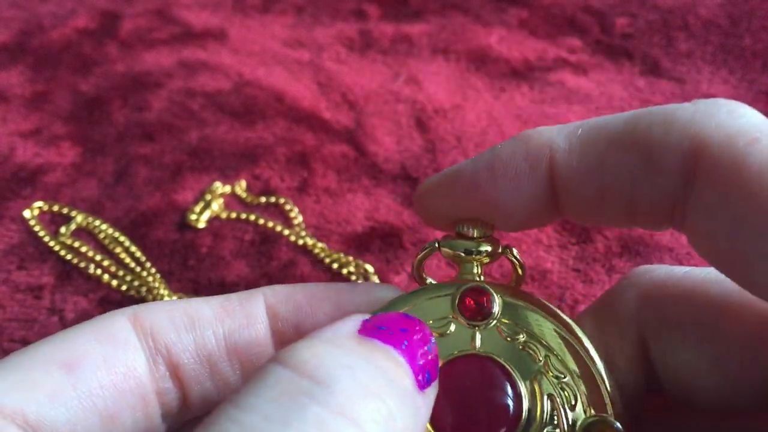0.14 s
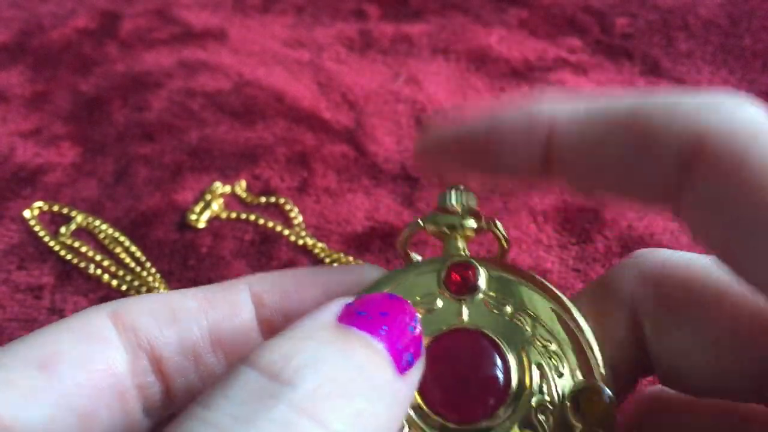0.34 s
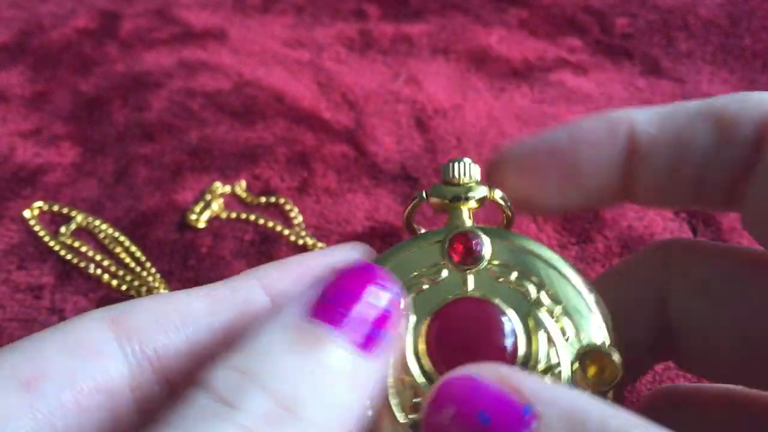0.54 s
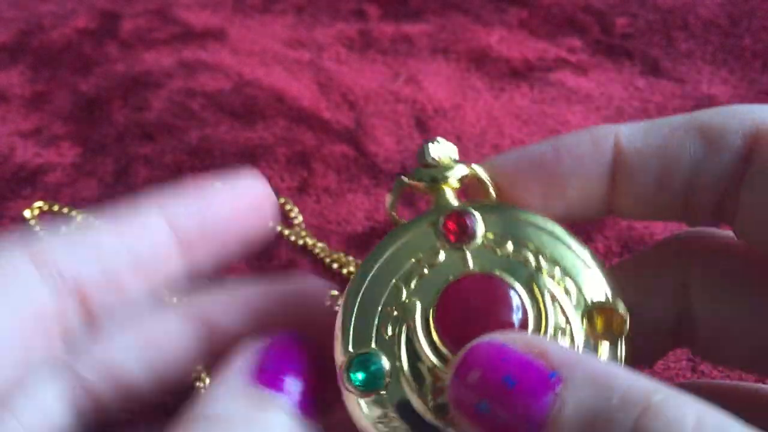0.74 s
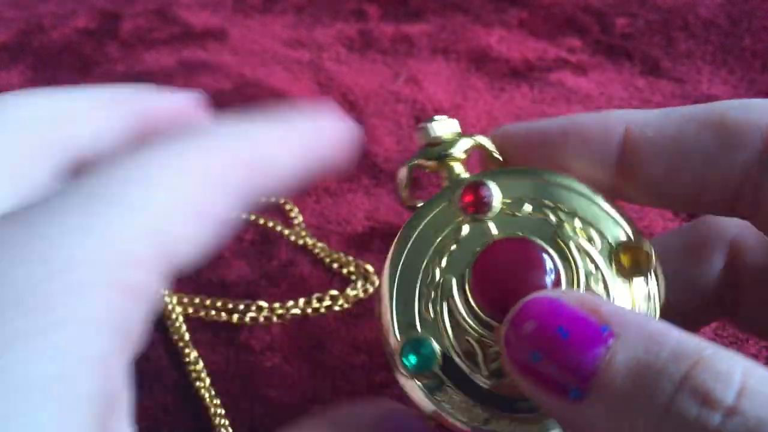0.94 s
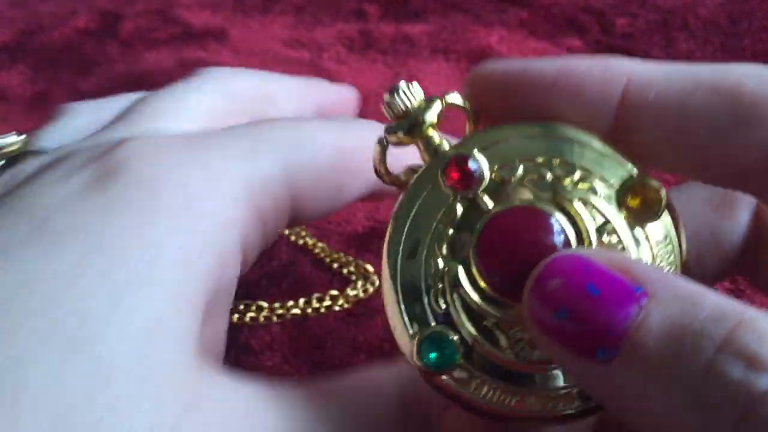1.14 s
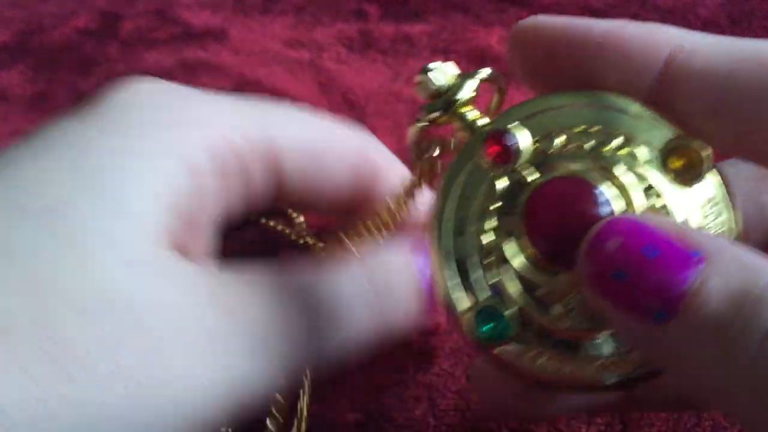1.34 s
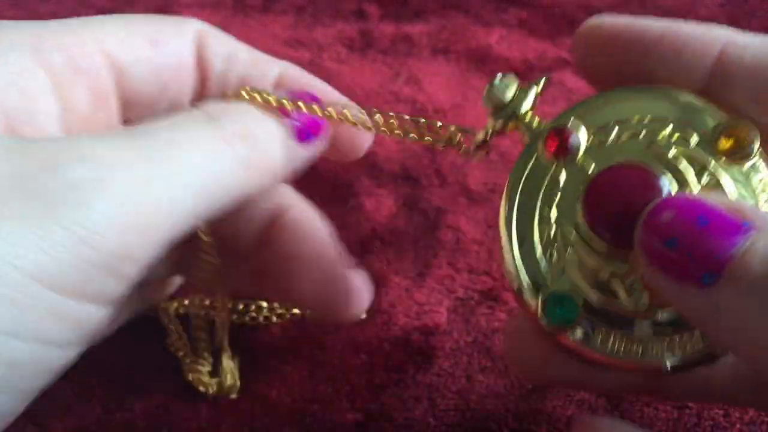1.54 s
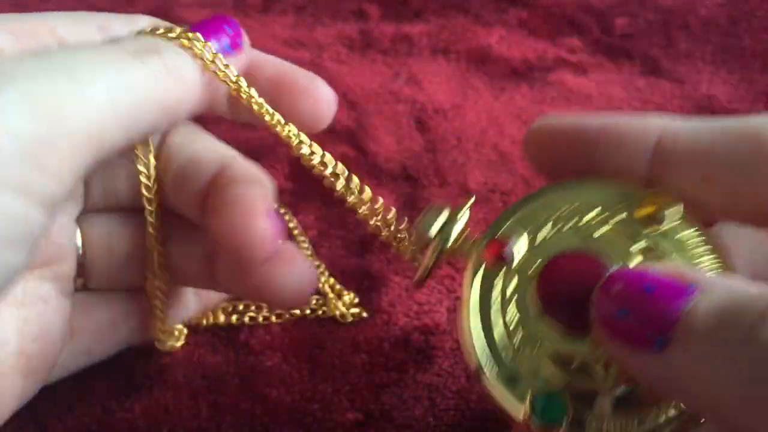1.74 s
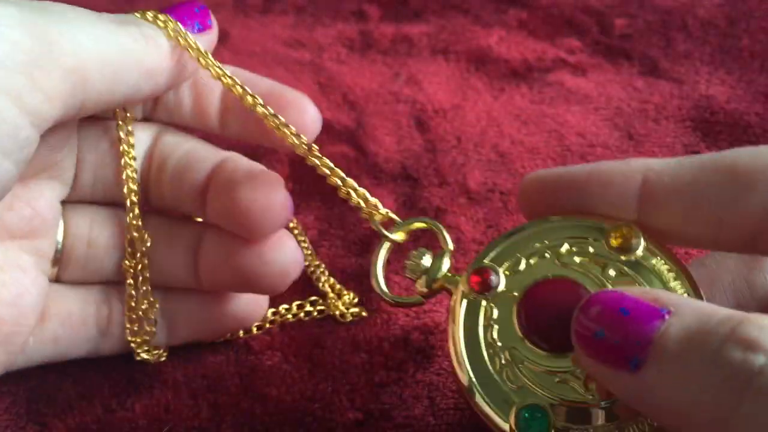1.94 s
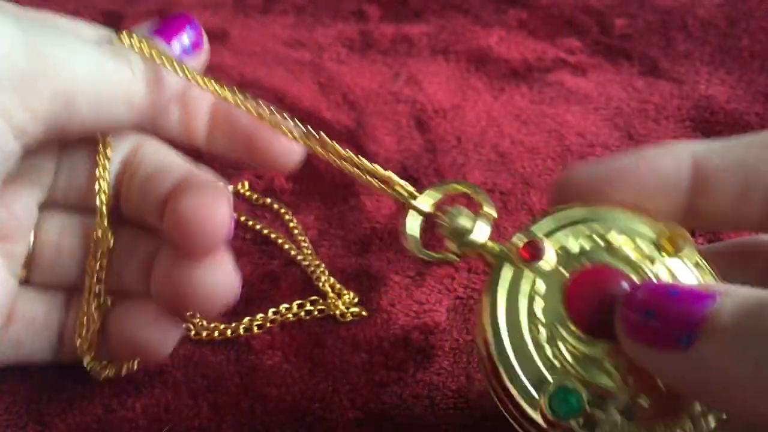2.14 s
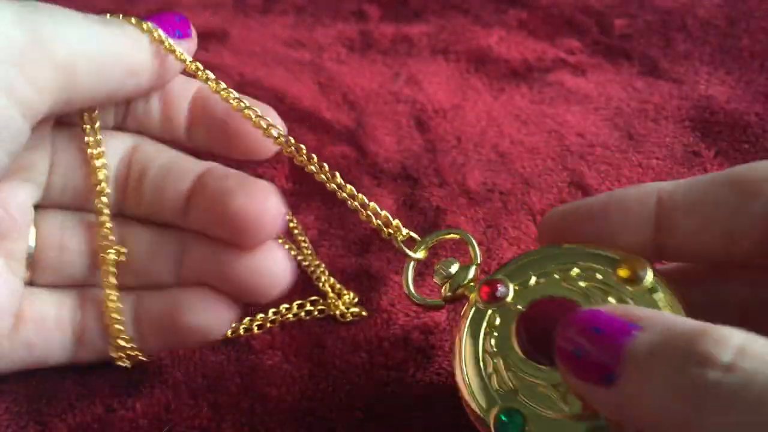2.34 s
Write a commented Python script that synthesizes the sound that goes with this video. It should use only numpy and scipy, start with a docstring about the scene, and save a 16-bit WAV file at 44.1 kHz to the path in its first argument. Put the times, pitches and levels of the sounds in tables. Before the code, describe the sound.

A metal pocket watch case snaps sharply, then a bright crown click and faint chain ticks

```python
"""A metal pocket watch close to a microphone: the crown is pressed and the latch snaps, the crown springs back
and chatters, then bow and chain tick and graze on the case. Each contact excites damped modes of the metal,
and a graze is a dense random train of tiny slips. A small soft room answers with decaying diffuse noise;
an appliance hums far off as a wavering sine over shaped rumble and hiss."""
import sys
import numpy as np
from scipy import signal
from scipy.fft import rfft, irfft, next_fast_len
from scipy.io import wavfile
from scipy.ndimage import map_coordinates

SR = 44100
rng = np.random.default_rng(int(sys.argv[2]) if len(sys.argv) > 2 else 0)


def volts(x):
    """Linear amplitude factor 10**(x/20) for a level x in dB, scalar or array-like."""
    e = np.asarray(x, float) / 20
    return 10 ** e


def persist_wave(psi):
    """Save psi, clipped to +-1, as 16-bit WAV."""
    counts = np.round(np.clip(psi, -1, 1) * 32767).astype(np.int16)
    wavfile.write(sys.argv[1], SR, np.atleast_2d(counts).T)


N = 105840  # length [samples]

# latch snap and the weaker knocks around it: t/s, level/dB
LATCH_BLOWS = [(0.2128, -13), (0.2122, -30), (0.2202, -50)]
# contacts of crown, bow and chain:
# t/s, level/dB, best excited f/Hz, its lead level/dB, treble tilt/(dB per octave)
CONTACTS = [(0.150, -68, 6800, 10, 4.5), (0.2088, -56, 4480, 14, -4), (0.2192, -52, 14000, 9, 7),
            (0.219, -54, 13700, 10, 3), (0.2345, -60, 6880, 20, -6), (0.3641, -58.5, 5270, 6.5, -1),
            (0.4655, -62, 2100, 9, -12), (0.690, -48, 5200, -4, -4), (0.6954, -41, 13930, 10, -4),
            (0.6953, -21.5, 4530, 2, 0), (0.6968, -30, 4500, 10, 0.5), (0.6981, -35.5, 12530, 0.5, -6),
            (0.7062, -40, 9000, 9.5, 0), (0.7131, -56.5, 12500, 4, 7), (0.7166, -42.5, 13700, 10, -1),
            (0.7188, -56, 5200, 17.5, 1), (0.731, -66, 5200, 4, -4), (0.865, -69.5, 2405, 11, -4),
            (1.137, -62, 5200, 12.5, 7), (1.150, -61.5, 13000, 5, -0.5), (1.2449, -68, 4530, 11.5, -2),
            (1.503, -71.5, 6910, 15.5, 5), (1.835, -65, 11800, 8.5, 4), (1.85, -71, 4390, 15.5, 1),
            (1.9023, -74.5, 6940, 29, 1), (1.912, -74, 6900, 17.5, -1), (1.914, -66, 4440, 19, -3),
            (1.947, -71, 4570, 10.5, -5), (1.963, -71, 7070, 25, 3), (2.0995, -55, 12900, 3.5, 1.5),
            (2.0994, -67.5, 4500, 4.5, 0), (2.132, -82, 15500, 20, 6)]
# room answer: f/Hz, t60/s, level/dB after the latch, level/dB after the crown
ROOM_ANSWER = [(400, .15, -12, -30.5), (1000, 0.24, -4, -13.5), (2100, 0.23, 3, 1), (2978, 0.24, -4, -4),
               (5021, .3, -5.5, 0.5), (6500, 0.36, -6, -7.5), (8500, 0.43, -2, -5), (10500, .2, -10, -7.5),
               (13000, 0.2, -9, 2.5), (15500, 0.16, -12, -2.5)]


def latch():
    """Impact excitation: the latch strikes the case, whose modes are damped by the fingers holding it."""
    # modes of the held case: f/Hz, level/dB (before scatter), t60/s
    case_modes = [(640, -10, .011), (900, -6, .011), (1250, -18, .009), (2040, -1, .011), (2580, -9, .012),
                  (3410, -2, .009), (4060, 0, .007), (5430, -2, .006), (6300, -10, .005), (7290, 1, .005),
                  (8440, -1, .005), (9520, -4, .0055), (11500, -18, .006), (13000, 1, .007),
                  (14700, -8, .007)]
    out = np.zeros(N + SR)
    for s, db in LATCH_BLOWS:
        add(out, s, volts(db) * ring(case_modes, contact_s=.0003))
    return out[:N]


def crown():
    """Impact and stick-slip excitation: single contacts and trains of tiny slips ring crown and bow."""
    # modes of crown and bow: f/Hz, level/dB (before scatter, lead and tilt), t60/s
    crown_modes = [(1370, -21.5, .01), (1893, -14.5, .01), (2383, -5, .014), (3023, -18.5, 0.0045),
                   (4530, 1.5, 0.0073), (5200, -6.5, .012), (6930, -8.5, 0.0049), (7995, -13.5, 0.0067),
                   (9030, -6.5, .008), (11800, -4.5, 0.0064), (12900, -5, .008), (13700, -13.5, .008),
                   (14300, -15.5, .008), (15500, -16.5, .008)]
    # metal grazing metal: start t/s, length/s, level/dB, best excited f/Hz, its lead level/dB
    grazes = [(0.127, 0.037, -81.5, 5200, 18), (0.131, .015, -82.5, 8900, 20.5),
              (0.204, 0.028, -88, 12900, 19), (0.182, 0.018, -72, 2350, 10), (0.7, 0.051, -66, 5200, 1),
              (0.74, .05, -79, 5200, 3), (0.796, 0.1, -87, 2390, 13), (1.127, 0.034, -75, 13000, 12),
              (1.237, 0.032, -86, 4440, 16), (1.53, .13, -95, 4480, 16.5), (1.82, 0.06, -89.5, 4500, 10),
              (1.89, .1, -88.5, 2380, 17.5), (1.905, 0.026, -87, 5200, 27), (2.131, .04, -90, 5200, 15)]
    # small parts radiate no bass: f/Hz, level/dB
    small_body = [(700, -18), (1150, 0)]
    slip_rate = 1600  # mean slips per second
    graze_tilt_db = -2  # dB per octave
    out = np.zeros(N + SR)
    for s, db, hz, lead_db, tilt_db in CONTACTS:
        add(out, s, volts(db) * ring(crown_modes, hz, lead_db, tilt_db))
    for s, length, db, hz, lead_db in grazes:
        chance, size = rng.random(SR // 5), rng.standard_normal(SR // 5)
        progress = np.clip(np.arange(SR // 5) / SR / length, 0, 1)
        swell = np.sin(np.pi * progress) ** .5
        slips = (chance < slip_rate / SR) * size * swell
        slip_ring = ring(crown_modes, hz, lead_db, graze_tilt_db)
        add(out, s, volts(db) * signal.fftconvolve(slips, slip_ring))
    return shaped(out[:N], small_body)


def ring(modes, favour_hz=5000, lead_db=0, tilt_db=0, contact_s=.00014):
    """Modal superposition: one blow sums damped modes of alternating sign and a short noise crack."""
    favour_oct, scatter_db = .1, 3.02  # width of the favoured band [octaves], random spread of modes [dB]
    grip = 1.034  # exponent over 1: fingers choke the ring ever faster
    crack_db, crack_t60 = -16, .004  # level [dB], decay [s]
    hz, db, t60 = np.transpose(modes)[:, :, None]
    t = np.arange(SR // 20) / SR
    db = db + scatter_db * rng.standard_normal(hz.shape)
    octaves_off = np.log2(hz / favour_hz)
    db = db + lead_db * np.exp(-(octaves_off / favour_oct) ** 2)
    db = db + tilt_db * np.log2(hz / 5000)
    sign = (-1.) ** np.arange(len(hz))[:, None]
    decay = volts(db - 60 * (t / t60) ** grip)
    tone = (sign * decay * np.sin(2 * np.pi * hz * t)).sum(axis=0)
    # differencing white noise tilts it to the treble
    crack = volts(crack_db - 60 * t / crack_t60) * np.diff(rng.standard_normal(len(t) + 1))
    onset = 1 - np.exp(-t / contact_s)
    return (tone + crack) * onset


def add(out, s, x):
    """Linear superposition: mixes x into out from time s [s]."""
    out[round(s * SR):][:len(x)] += x


def room(ringing, events, colour_db):
    """Diffuse reverberation: noise whose bands decay at their own speeds answers the blows and the ring."""
    blow_db, ring_db = -12.5, -48  # sent to the room [dB]
    build_s, wall_s = .015, .005  # time constant of the echo's filling in, delay of the echo [s]
    hz, t, z = signal.stft(rng.standard_normal(SR // 2), SR, nperseg=256)
    f, t60 = np.transpose(ROOM_ANSWER)[:2]
    decay = volts(-60 * t / np.interp(hz, f, t60)[:, None])
    build = 1 - .8 * np.exp(-t / build_s)
    tail = signal.istft(z * decay * build, SR, nperseg=256)[1]
    tail = tail / np.linalg.norm(tail)
    blows = np.zeros(N)
    for s, db, *_ in events:
        blows[round(s * SR)] = volts(db)
    broad_answer = volts(blow_db) * shaped(blows, np.transpose([f, colour_db]))
    sent = broad_answer + volts(ring_db) * ringing
    delayed = np.pad(sent, (round(wall_s * SR), 0))
    return signal.fftconvolve(delayed, tail)[:N]


def room_tone():
    """Stationary noise and a modulated tone: rumble, hiss and a hum wavering in level and phase."""
    # rumble spectrum: f/Hz, relative level/dB per Hz
    rumble_spectrum = [(15, -60), (30, -30), (42, -14.5), (52, 2), (62, -0.5), (70, -6), (81, -0.5),
                       (93, -8.5), (108, -6), (119, -2), (132, -11.5), (178, -6), (205, -11), (225, -13),
                       (237, -9), (256, -16), (300, -26.5), (335, -32), (352, -22.5), (375, -34),
                       (500, -40), (1000, -120)]
    # hiss spectrum: f/Hz, relative level/dB per Hz
    hiss_spectrum = [(240, -33), (400, -4.5), (426, -0.5), (460, -9), (572, -4), (669, -7), (1120, -7),
                     (1410, -7.5), (2250, -5), (2510, -8), (4330, -11), (4830, -12.5), (7120, -14),
                     (15000, -21.5), (16500, -33)]
    # hiss with the rustle of skin and cloth: t/s, level/dB (before its wavering)
    rustle = [(0.0, -74), (0.25, -73.5), (2.38, -73)]
    rumble_db = -49.5
    hum_hz, hum_db, hum_wander_db = 120.3, -55.5, 5  # centre frequency, centre level, greatest wander
    hum_rate, hiss_rate = 7, 12  # wander knots per second
    t = np.arange(N) / SR
    hum_level = volts(hum_db + hum_wander_db * np.tanh(wobble(hum_rate)))
    hum_phase = 2 * np.pi * hum_hz * t + 0.28 * wobble(hum_rate)  # rad
    hum = hum_level * np.sqrt(2) * np.sin(hum_phase)
    hiss_db = np.interp(t, *np.transpose(rustle)) + .7 * wobble(hiss_rate)
    hiss = volts(hiss_db) * colour(hiss_spectrum)
    return volts(rumble_db) * colour(rumble_spectrum) + hum + hiss


def colour(points):
    """Spectral shaping of white noise: rms 1, with an (f/Hz, level/dB) spectrum."""
    x = shaped(rng.standard_normal(N + SR), points)[SR // 2:][:N]
    return x / x.std()


def wobble(rate):
    """Spline interpolation of random values: a smooth curve with rate knots per second."""
    return map_coordinates(rng.standard_normal(400), [np.arange(N) * rate / SR])


def shaped(x, points):
    """Zero-phase linear filtering: x through an (f/Hz, level/dB) response, drawn over log frequency."""
    m = next_fast_len(len(x) + 8192)
    f, v = np.transpose(points)
    log_hz = np.log(np.fft.rfftfreq(m, 1 / SR) + 1)
    gain = volts(np.interp(log_hz, np.log(f + 1), v))
    return irfft(rfft(x, m) * gain, m)[:len(x)]


def scene():
    """Superposition of direct sound, reverberation and background: watch, its echo and the room tone."""
    snap, small = latch(), crown()
    latch_db, crown_db = np.transpose(ROOM_ANSWER)[2:]
    echo = room(snap, LATCH_BLOWS, latch_db) + room(small, CONTACTS, crown_db)
    return (snap + small + echo + room_tone())[None]


def top_cut(x):
    """Nothing passes above the cut-off."""
    return signal.sosfilt(signal.butter(12, 16750, fs=SR, output="sos"), x)


def record(dry):
    """Transducer frequency response: the microphone colours the sound and cuts the highest treble."""
    # microphone response: f/Hz, level/dB
    mic_response = [(9800, -1), (10500, -2.5), (11200, 0.5), (15600, 0), (16000, -14.5), (17000, -41)]
    mix = shaped(dry[0], mic_response)[None]
    return top_cut(mix)


dry = scene()
out = record(dry)
persist_wave(out)
```